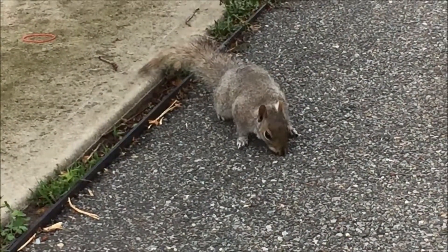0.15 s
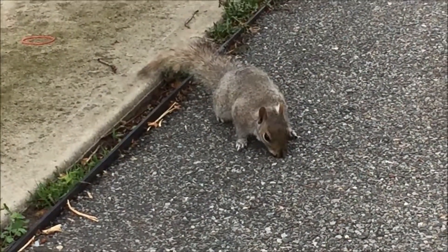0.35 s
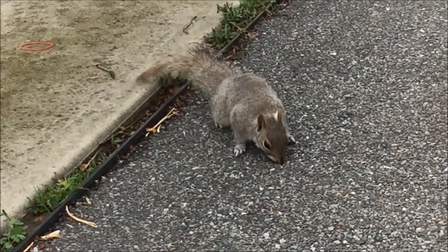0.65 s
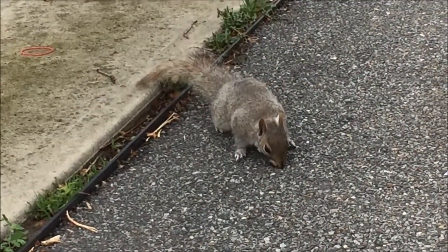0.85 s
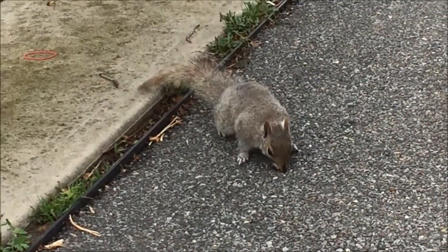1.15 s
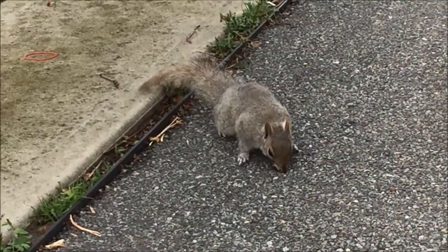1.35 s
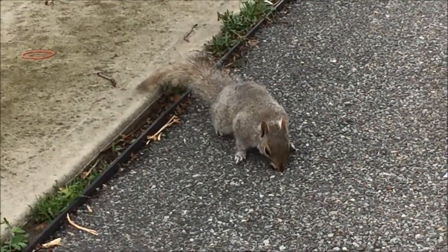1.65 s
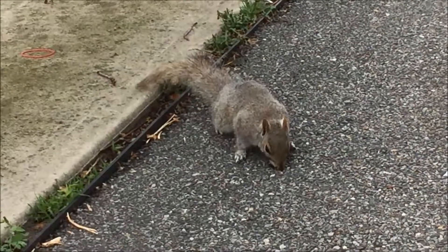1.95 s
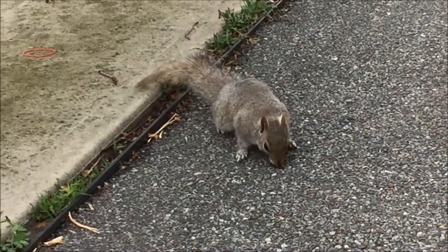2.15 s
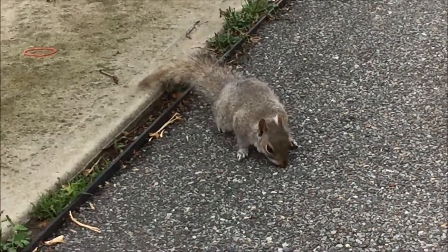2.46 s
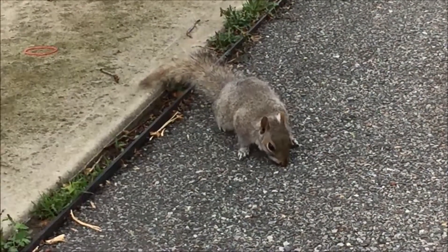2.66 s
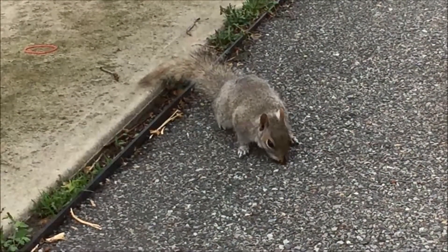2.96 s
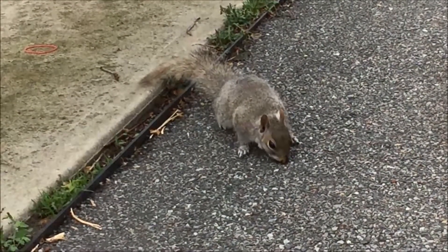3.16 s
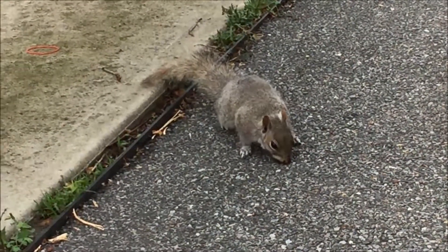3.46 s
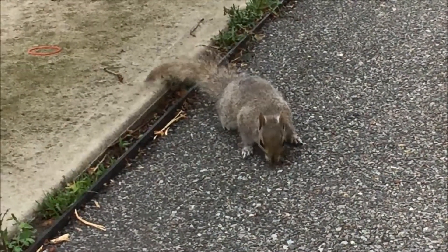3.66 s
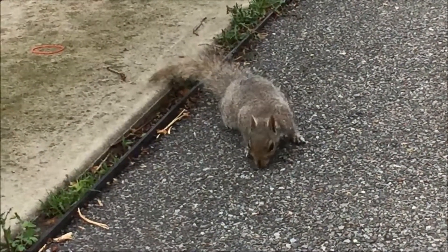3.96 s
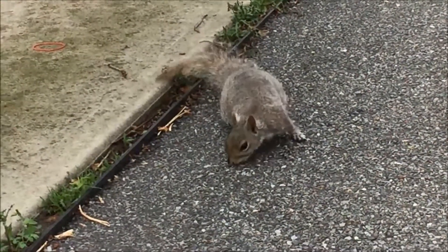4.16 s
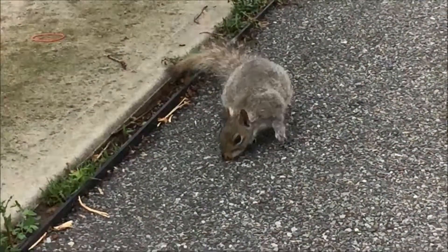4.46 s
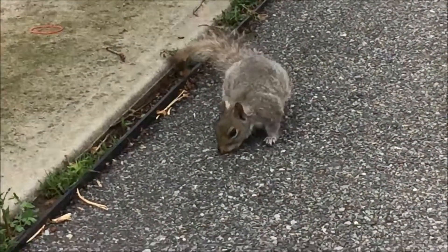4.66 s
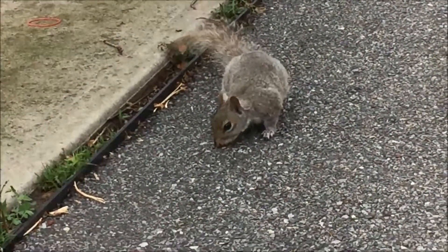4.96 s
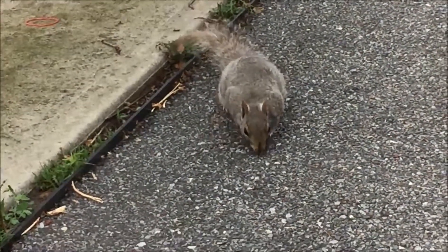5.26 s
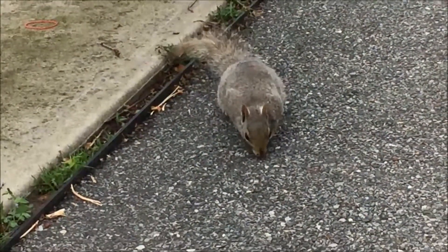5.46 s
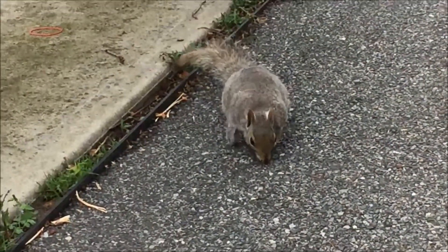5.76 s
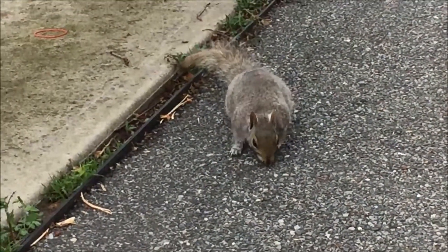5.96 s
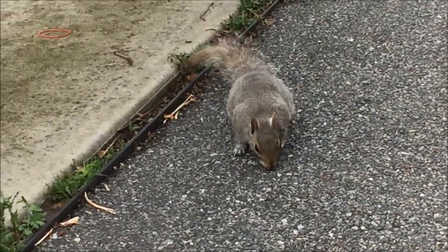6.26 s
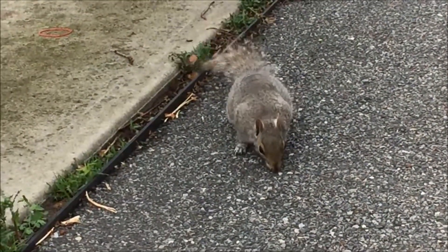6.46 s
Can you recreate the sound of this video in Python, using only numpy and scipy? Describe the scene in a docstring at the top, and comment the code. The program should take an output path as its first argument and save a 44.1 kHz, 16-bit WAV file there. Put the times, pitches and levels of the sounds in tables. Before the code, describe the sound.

A steady, deep rumble of distant traffic fills an open park. Close by, a squirrel makes very small, dry ticks and scratches on asphalt. Thin high whistles come faintly from a small bird in the first half; later a lower warbling bird sings short slurred notes. A far engine swells around four seconds and again near the end. Mono outdoor pickup with faint hiss.

```python
"""Far traffic rumbles and roars softly in a city park; thin high whistles, a lower warble and far chirps
sound among the trees, and a squirrel close by scratches and ticks on asphalt. A faint hiss lies under all.
Traffic and hiss are shaped noise; one engine and a machine hum are wandering sines.
Birds are gliding, trembling sines with scattered echoes; claws and crumbs ring resonances of the grit."""
import sys
import numpy as np
from scipy import signal
from scipy.fft import rfft, irfft
from scipy.io import wavfile

SR = 44100
rng = np.random.default_rng(int(sys.argv[2]) if len(sys.argv) > 2 else 0)


def generate_wav(signal):
    """Clip the signal to [-1, 1] and save it as 16-bit WAV at the path in sys.argv[1]."""
    frames = np.transpose(np.atleast_2d(signal))
    scaled = np.clip(frames, -1, 1) * 32767
    pcm = np.round(scaled).astype(np.int16)
    wavfile.write(sys.argv[1], SR, pcm)


N = 291466
TIME = np.arange(N) / SR


def from_db(db):
    """Decibels to amplitude gain."""
    return 10 ** (np.asarray(db) / 20)


def rms_one(x):
    """Scale to unit rms."""
    return x / np.sqrt(np.mean(x ** 2) + 1e-20)


def coloured_noise(spectrum):
    """Steady noise of rms 1 with the given spectrum, falling 33 dB per octave past its ends."""
    hz, db = np.transpose(spectrum)
    bins_hz = np.maximum(np.fft.rfftfreq(N, 1 / SR), 1)
    octaves_outside = np.abs(np.log2(bins_hz / np.clip(bins_hz, hz[0], hz[-1])))
    gain_db = np.interp(np.log(bins_hz), np.log(hz), db) - 33 * octaves_outside
    white = rng.standard_normal(N)
    return rms_one(irfft(rfft(white) * from_db(gain_db), N))


def drift(rate_hz):
    """Random wandering of rms 1: noise low-passed at rate_hz, mean removed."""
    bins_hz = np.fft.rfftfreq(N, 1 / SR)
    gain = (bins_hz > 0) / (1 + (bins_hz / rate_hz) ** 4)
    return rms_one(irfft(rfft(rng.standard_normal(N)) * gain, N))


def resonate(x, hz, width_hz):
    """Two-pole resonance with gain 1 at its peak."""
    radius = np.exp(-np.pi * width_hz / SR)
    angle = 2 * np.pi * min(hz, SR / 2 - 1) / SR
    zeros = np.array([1, 0, -1]) * (1 - radius * radius) / 2
    poles = [1, -2 * radius * np.cos(angle), radius * radius]
    return signal.lfilter(zeros, poles, x + 1e-18)


def tone(hz):
    """A sine of rms 1 following a pitch curve."""
    return np.sqrt(2) * np.sin(2 * np.pi * np.cumsum(hz) / SR)


def add(out, start_s, sound):
    """Mix a sound in at start_s."""
    start = max(round(start_s * SR), 0)
    out[start:start + len(sound)] += sound[:N - start]


def scatter(x, t60_s, wet_db):
    """Trunks, leaves and ground return a cloud of small echoes that dies 60 dB in t60_s."""
    age_s = TIME[:SR]
    echoes = rng.standard_normal(SR) * from_db(-60 * age_s / t60_s)
    echoes /= np.linalg.norm(echoes)
    return x + from_db(wet_db) * signal.fftconvolve(x, echoes)[:N]


def traffic(rumble_db=-33, tyres_db=-45):
    """Many far engines merge into a rumble, and their tyres into a smooth roar."""
    # noise spectra: (frequency [Hz], relative density [dB])
    rumble_spectrum = [(22, -53), (32, -31), (45, -4.5), (62, 1), (95, -0.34), (140, -2), (200, -7.5),
                       (260, -11.5), (330, -19), (420, -24), (520, -26.5)]
    tyre_spectrum = [(280, -28), (480, -9), (644, -5), (696, -3), (758, -4.5), (941, 0), (1070, -2),
                     (1410, -3), (2020, -8), (3050, -27), (3960, -33.5), (6710, -120)]
    rumble = from_db(rumble_db + 0.87 * drift(1.5)) * coloured_noise(rumble_spectrum)
    tyres = from_db(tyres_db + 0.3 * drift(17.0)) * coloured_noise(tyre_spectrum)
    return rumble + tyres


def engine(firing_hz=71.5, idle_db=-53, overtone_db=-9):
    """One heavy engine swells under load at a nearly steady rate: firing tone plus its octave."""
    # load swells added to idle: (loudest time [s], Gaussian half length [s], firing tone level [dB])
    swells = [(3.985, 0.45, -37), (5.405, 0.47, -41.5), (6.204, .4, -39)]
    load = from_db(idle_db)
    for peak_s, half_s, db in swells:
        load = load + from_db(db) * np.exp(-((TIME - peak_s) / half_s) ** 2)
    rate_hz = firing_hz * (1 + 0.01393 * drift(2.96))
    return load * (tone(rate_hz) + from_db(overtone_db) * tone(2 * rate_hz))


def machine_hum(hum_hz=361, hum_db=-60.5, waver_db=2.5):
    """A sine that fades in and out on the air, its pitch wandering slightly."""
    gain = from_db(hum_db + waver_db * drift(2.1))
    return gain * tone(hum_hz + 2.68 * drift(5.4))


def scrape(length_s, bright_hz, contact_width_hz=7000, slips_per_s=1600, uneven_db=3.0):
    """Separate tiny slips of uneven size; pressure bites quickly and lets go slowly."""
    age_s = TIME[TIME < length_s]
    chance, size, sign = rng.random((3, SR))[:, :len(age_s)]
    slip_size = from_db(-uneven_db * np.log(size + .01))
    slips = (chance < slips_per_s / SR) * np.sign(sign - .5) * slip_size
    pressure = np.sin(np.pi * np.sqrt(age_s / length_s))
    return pressure * rms_one(resonate(slips, bright_hz, contact_width_hz))


def snap(bright_hz, contact_width_hz=7000, decay_s=.0001):
    """A grain gives way at once: a decaying noise burst of peak 1."""
    age_s = TIME[:256]
    burst = rng.standard_normal(len(age_s)) * np.exp(-age_s / decay_s)
    crack = resonate(burst, bright_hz, contact_width_hz)
    return crack / np.abs(crack).max()


def squirrel(crumbs_per_s=12, crumb_db=-53):
    """Claws catch with a snap and drag; the body shifts, crumbs tick; all of it rings the grit."""
    # claw strokes: (catch time [s], drag length [s], drag force level [dB], contact resonance [Hz])
    strokes = [(.224, .025, -65, 8500), (0.699, .007, -57.5, 11000), (.996, 0.023, -50, 8800),
               (1.143, 0.091, -71.5, 11000), (1.38, .006, -73, 7000), (1.645, .015, -69, 8000),
               (1.704, .055, -67, 9000), (2.144, 0.037, -67, 6500), (2.529, .01, -60, 8500),
               (2.576, .016, -60, 8000), (2.722, 0.0025, -57, 14000), (3.578, .008, -68, 12000),
               (4.59, .025, -72, 14000), (4.692, .016, -69.5, 7600), (5.078, 0.046, -69, 8000),
               (5.548, .018, -67.5, 4600), (5.585, .04, -69.5, 4600), (6.108, 0.015, -57, 8000)]
    # ring of the grit: (centre [Hz], width [Hz], gain [dB])
    grit = [(4200, 870, 2.5), (5670, 850, 4.5), (6730, 700, 5), (8400, 1800, 3.5), (11100, 3900, 2),
            (13900, 2200, 1.5)]
    lead_in_s, lead_in_db = .014, -9  # faint short scrape leading into each snap, dB re drag
    snap_db = 18.5  # snap peak re drag
    crumb_hits = rng.random(N) < crumbs_per_s / SR
    force = crumb_hits * rng.standard_normal(N) * from_db(crumb_db)
    # the body shifts its weight
    add(force, 3.015, from_db(-73.5) * scrape(length_s=.67, bright_hz=5850))
    for catch_s, drag_s, db, bright_hz in strokes:
        add(force, catch_s - lead_in_s, from_db(db + lead_in_db) * scrape(lead_in_s, bright_hz))
        add(force, catch_s, from_db(db + snap_db) * snap(bright_hz))
        add(force, catch_s, from_db(db) * scrape(drag_s, bright_hz))
    ring = np.zeros(N)
    for k, (hz, width_hz, db) in enumerate(grit):
        ring += (-1) ** k * from_db(db) * resonate(force, hz, width_hz)  # alternate polarity
    return scatter(ring, t60_s=0.15, wet_db=-10.0)


def bird(notes, settle_s, swell, waver, flutter_db, tremble_hz, trill_hz=22.0):
    """Trembling sines slide onto a held pitch, plain or trilled; with swell under 1 they peak early."""
    out, wobble, flutter = np.zeros(N), drift(tremble_hz), drift(40)
    for start_s, length_s, start_hz, held_hz, db, *trill_depth_hz in notes:
        span = (TIME >= start_s) & (TIME < start_s + length_s)
        age_s = TIME[span] - start_s
        hz = held_hz + (start_hz - held_hz) * np.exp(-age_s / settle_s)
        hz = hz + sum(trill_depth_hz) * np.cos(2 * np.pi * trill_hz * age_s)  # no depth given: plain
        envelope = np.sin(np.pi * (age_s / length_s) ** swell)
        gain = from_db(db + flutter_db * flutter[span])
        out[span] += gain * envelope * tone(hz * (1 + waver * wobble[span]))
    return out


def warbler():
    """A songbird's slurred, sometimes trilled notes, each peaking early."""
    # (start [s], length [s], start pitch [Hz], held pitch [Hz], level before flutter [dB], trill depth [Hz])
    song = [(1.33, 0.065, 2950, 2850, -65, 0), (1.66, .06, 3450, 3200, -65, 0),
            (4.203, .055, 3220, 3350, -59, 0), (4.235, 0.13, 3270, 2446, -55.5, 0),
            (4.603, .2, 2900, 2795, -53.5, 151), (4.9, .09, 2280, 2114, -53.5, -2),
            (5.015, 0.14, 2484, 2545, -55, 0), (5.385, 0.23, 2890, 3150, -59.5, 70),
            (5.49, .055, 2430, 2590, -55, -2), (5.655, 0.062, 2340, 2420, -53.5, 0),
            (5.722, 0.097, 2990, 3055, -54.5, 2), (5.812, .05, 2780, 2730, -55, 0),
            (5.955, 0.053, 3550, 3200, -68, -1), (6.205, .078, 2890, 2530, -50, 0),
            (6.31, 0.11, 3060, 2920, -64, 0)]
    dry_song = bird(song, settle_s=.024, swell=0.56, waver=0.012, flutter_db=3.5, tremble_hz=110)
    return scatter(dry_song, t60_s=0.5, wet_db=-7.5)


def whistler():
    """A small bird's thin whistles scoop up or down onto a held pitch."""
    # (start [s], length [s], start pitch [Hz], held pitch [Hz], level before flutter [dB])
    whistles = [(1.51, 0.1, 8050, 8280, -77), (1.61, 0.19, 8900, 8420, -73), (2.24, 0.24, 7040, 7560, -70),
                (2.44, .17, 8850, 8300, -69), (3.08, .22, 7030, 7640, -66.5), (3.3, .19, 8800, 8400, -65.5),
                (4.19, 0.23, 8720, 8900, -75), (5.09, 0.18, 9000, 8580, -73)]
    dry_song = bird(whistles, settle_s=.075, swell=1.0, waver=0.0093, flutter_db=3.5, tremble_hz=330)
    return scatter(dry_song, t60_s=0.44, wet_db=-2.0)


def far_birds(count=50, level_db=-69.5, low_hz=2450, high_hz=3300):
    """Short falling notes from deeper in the park, at random times, pitches and levels."""
    when, pitch, strength = rng.random((count, 3)).T
    hz = low_hz + (high_hz - low_hz) * pitch
    length_s = np.full(count, .05)
    chirps = np.column_stack([when * TIME[-1], length_s, hz, .92 * hz, level_db + 4 * strength])
    dry_song = bird(chirps, settle_s=.024, swell=.8, waver=0.012, flutter_db=1.5, tremble_hz=80)
    return scatter(dry_song, t60_s=0.43, wet_db=-6)


def hiss(level_db=-74):
    """Faint, even high-frequency noise."""
    # (frequency [Hz], relative density [dB])
    hiss_spectrum = [(4200, -2), (5000, -7), (5800, -6), (7500, -10.5), (9300, -9), (10500, -15.5),
                     (12000, -11), (15500, -15.5)]
    return from_db(level_db) * coloured_noise(hiss_spectrum)


def scene():
    """Sum traffic, drones, squirrel, birds and hiss into one channel."""
    drones = engine() + machine_hum()
    birds = warbler() + whistler() + far_birds()
    return (traffic() + drones + squirrel() + birds + hiss())[None]


def record(dry, cutoff_hz=15830):
    """A steep elliptic low-pass removes the top."""
    low_pass = signal.ellip(12, .1, 80, cutoff_hz, fs=SR, output="sos")  # ripple, stopband [dB]
    return signal.sosfilt(low_pass, dry)


dry = scene()
out = record(dry)
generate_wav(out)
```